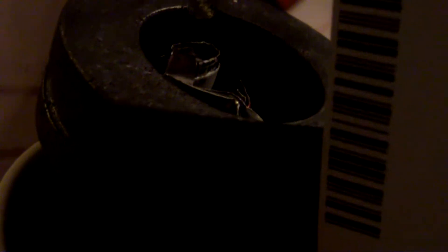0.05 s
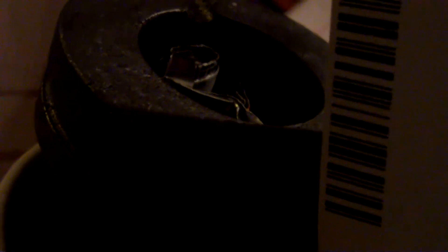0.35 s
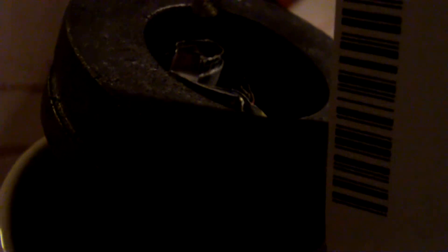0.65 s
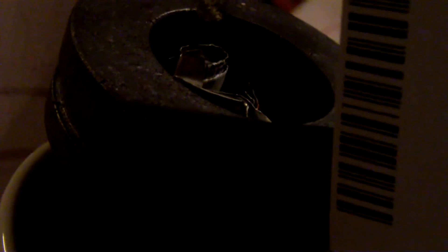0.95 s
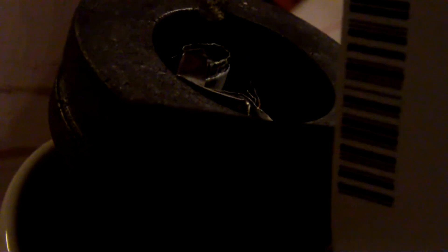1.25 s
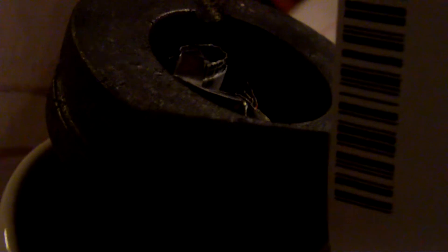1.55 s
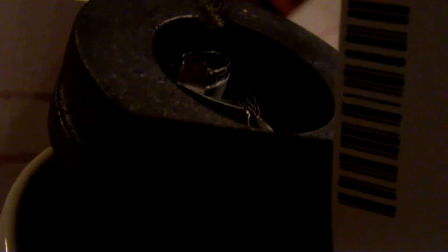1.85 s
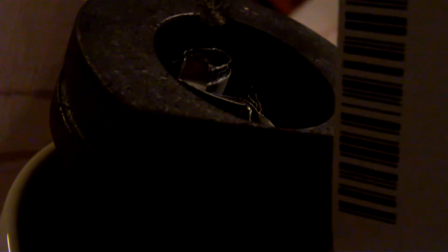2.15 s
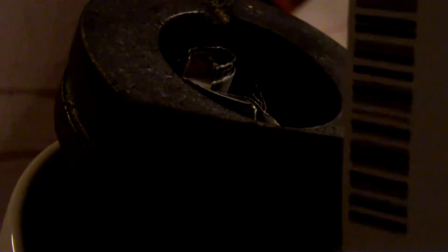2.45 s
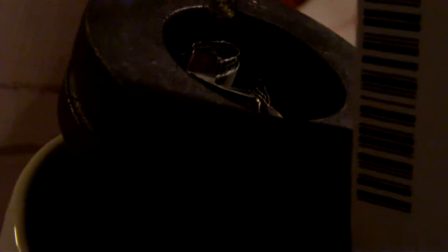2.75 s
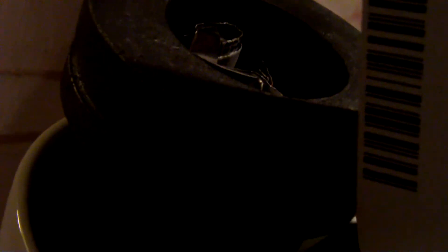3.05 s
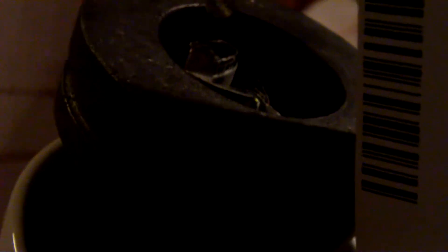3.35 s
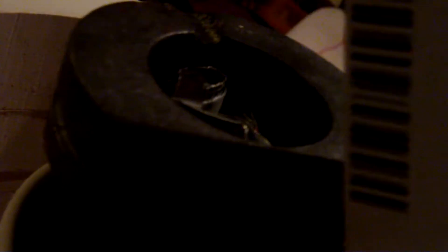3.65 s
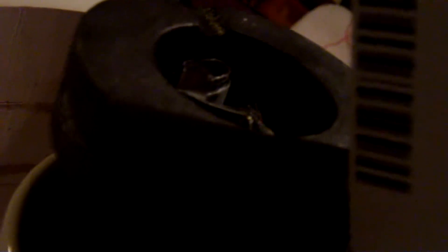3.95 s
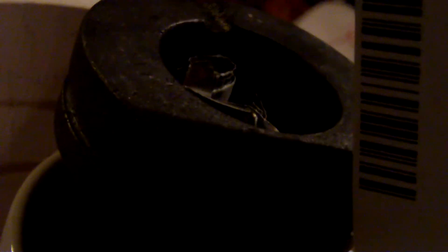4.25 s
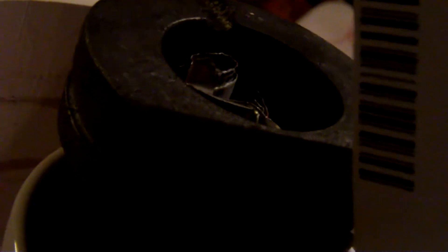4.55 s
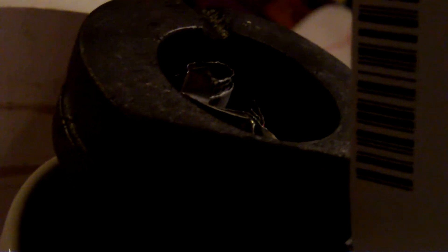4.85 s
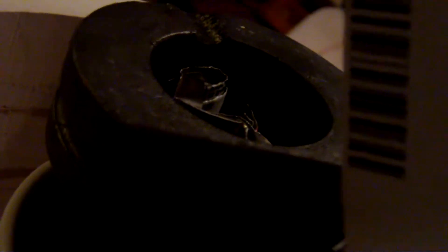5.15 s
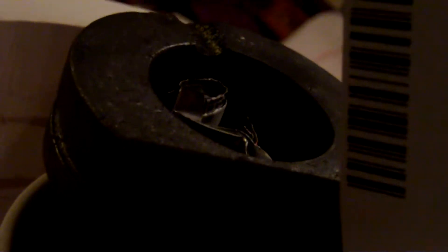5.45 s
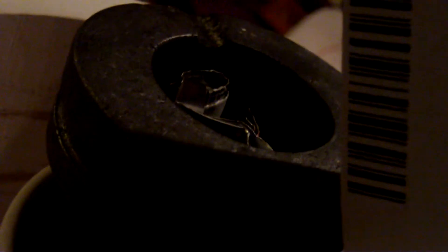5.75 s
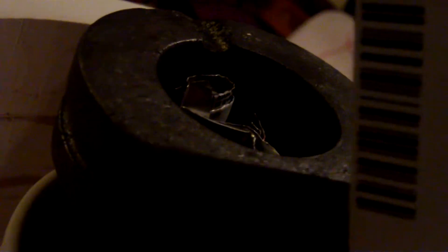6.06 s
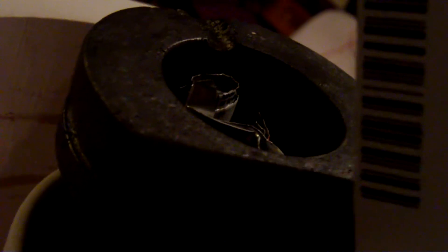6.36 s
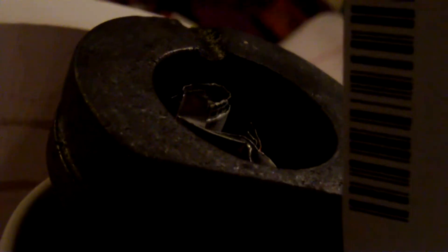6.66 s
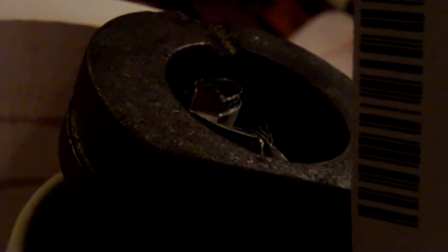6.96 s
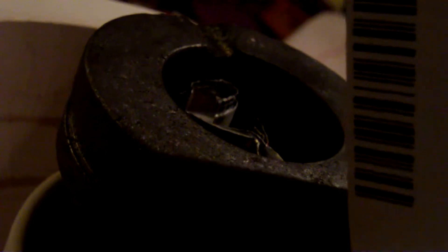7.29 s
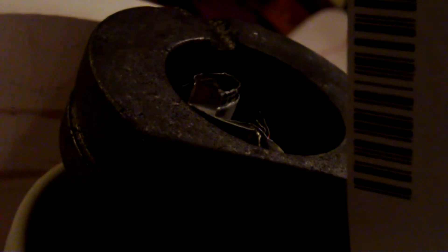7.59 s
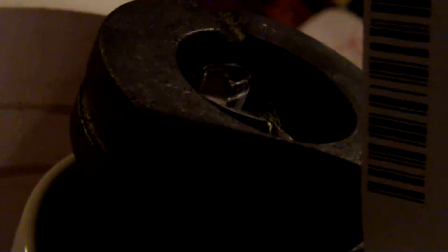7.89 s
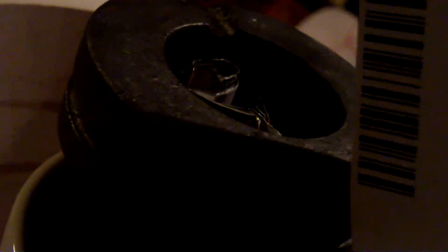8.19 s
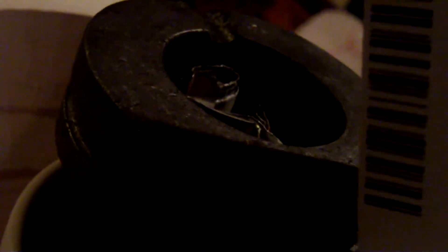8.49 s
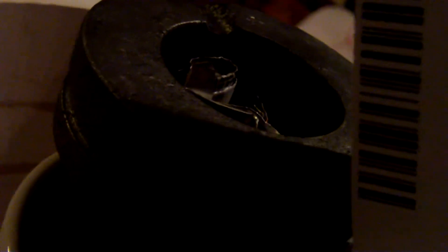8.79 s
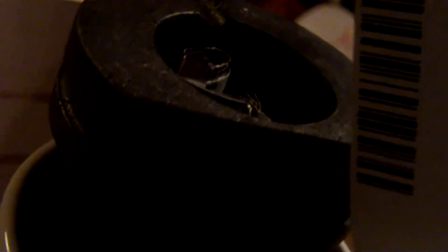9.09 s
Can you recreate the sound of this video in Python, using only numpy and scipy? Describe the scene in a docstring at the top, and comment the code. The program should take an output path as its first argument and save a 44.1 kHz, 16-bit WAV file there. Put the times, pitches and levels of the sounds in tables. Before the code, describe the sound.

A soft, bright hiss with a fine sizzle comes from something hot in the hollow of a stone bowl, close by in a quiet room. Two small, dry ticks sound at about 0.5 seconds, followed by faint rubs as the hiss sinks. At 2.6 seconds there is a tick and the hiss surges suddenly like escaping steam, loudest near 2.8 seconds. It drops back, swells more mildly around 3.8 seconds, then carries on at a moderate, wavering level. Light ticks come between 3.1 and 3.5 seconds, in a quick cluster near 4.4, sharply at 5.1 and once more at 7.8. From about 8 seconds the hiss sputters and fades low, still faint at 9 seconds. Underneath, the hand-held microphone picks up a low, even room rush, a few very soft bumps and a barely audible breathy whistle that comes and goes.

```python
"""Hot hiss in a stone bowl

Something hot hisses in the hollow of a stone-like bowl, close by in a quiet room. The vapour jet
is turbulence and fine sizzle ringing in the hollow; it surges once, slowly eases and sputters.
Light rubs and small ticks ring a damped body, with a few soft bumps in between.
A nearly mono hand-held microphone hears it over the room's low-level rush and a faint whistle."""
import sys
import numpy as np
from scipy import signal
from scipy.fft import rfft, irfft
from scipy.io import wavfile

SR = 44100
rng = np.random.default_rng(int(sys.argv[2]) if len(sys.argv) > 2 else 0)


def materialize(psi):
    """Save the field psi as 16-bit PCM at rate SR to the path in sys.argv[1].

    A 1-D psi becomes a single channel; in a 2-D psi each row is a channel.
    """
    bounded = np.clip(np.atleast_2d(psi).T, -1, 1)
    quanta = np.round(bounded * 32767).astype(np.int16)
    wavfile.write(sys.argv[1], SR, quanta)


N = 407043
TIME = np.arange(N) / SR
FREQS = np.maximum(np.arange(N // 2 + 1) * SR / N, 1)
CUTOFF_HZ = 15350


def from_db(db):
    """Decibels to gain."""
    return 10 ** (np.asarray(db) / 20)


def rms_one(x):
    """Scale to rms 1."""
    return x / np.sqrt(np.mean(x ** 2) + 1e-20)


def colour(x, points):
    """EQ x with a curve of (Hz, dB) points."""
    hz, db = np.transpose(points)
    return irfft(rfft(x) * from_db(np.interp(np.log(FREQS), np.log(hz), db)), N)


def band(x, low_hz, high_hz):
    """The part of x between two frequencies."""
    return irfft(rfft(x) * (FREQS > low_hz) * (FREQS < high_hz), N)


def drift(rate_hz):
    """A random wobble of rms 1, mostly slower than rate_hz."""
    return rms_one(irfft(rfft(rng.standard_normal(N)) / (1 + (FREQS / rate_hz) ** 2), N))


def swell(middle_s, length_s):
    """A smooth rise from 0 to 1 and back."""
    return np.cos(np.pi * np.clip((TIME - middle_s) / length_s, -.5, .5)) ** 2


def resonate(x, hz, width_hz):
    """A resonance with gain 1 at its peak."""
    return signal.lfilter(*signal.iirpeak(hz, hz / width_hz, fs=SR), x)


def ring(clicks, hz, t60):
    """Each click starts a sine of its own height that falls 60 dB in t60 seconds."""
    decay, step = from_db(-60 / (t60 * SR)), 2 * np.pi * hz / SR
    feedback = [1, -2 * decay * np.cos(step), decay * decay]
    return signal.lfilter([0, decay * np.sin(step)], feedback, clicks + 1e-18)


# Room tone EQ, for the centre and for the stereo width. Each row: frequency in Hz, gain in dB.
ROOM_MID_EQ = [(25, -8), (45, 0.5), (65, -5.5), (100, -1), (150, -2.5), (300, -0.5), (600, 2), (1150, 3),
               (2000, 2), (3500, -2.5), (7000, -2.5), (15000, -25.5)]
ROOM_SIDE_EQ = [(25, -32), (60, -15), (125, -11), (300, -2.5), (600, 1.5), (1000, 4.5), (2000, -11),
                (5000, -25), (9000, -28), (15000, -25)]

def room_rush(eq, level_db):
    """The room's even rush: a bed of coloured noise."""
    return from_db(level_db) * rms_one(colour(rng.standard_normal(N), eq))


def sizzle(per_s, spread_db):
    """Tiny bursts at random moments, each with a random size and sign."""
    sizes = from_db(spread_db * np.minimum(rng.exponential(1, N), 4)) * rng.choice([-1, 1], N)
    return rms_one(sizes * (rng.random(N) < per_s / SR))


def fizz(level_db=-12, t60=0.0033):
    """Tiny bursting bubbles: brief pings at pitches spread across the treble."""
    pitches_hz = np.linspace(2800, 14800, 14)
    pings = sum(ring(sizzle(per_s=80, spread_db=1.5), hz, t60) for hz in pitches_hz)
    return from_db(level_db) * rms_one(pings)


def reflections(x, level_db, longest_s, count=14):
    """Nearby surfaces return weak copies; their paths sway with the hand and ripple the spectrum."""
    sway, out = drift(rate_hz=.3), x.copy()
    lags_s = rng.uniform(0.000973, longest_s, count)
    swings_s = rng.normal(0, 1.2e-5, count)
    for lag, swing, sign in zip(lags_s, swings_s, rng.choice([-1, 1], count)):
        out += sign * from_db(level_db) * np.interp(TIME - lag - swing * sway, TIME, x)
    return out


# The jet's flow, as the envelope of its hiss. Each row: time in seconds, level in dB.
JET_FLOW = [(0, -51), (0.95, -51.8), (1.75, -56), (2.5, -57.5), (2.7, -38.5), (2.84, -31), (3.14, -37),
            (3.38, -45.5), (3.81, -39), (4.23, -46), (4.58, -43), (5.2, -48.5), (5.95, -47.5),
            (6.45, -44.5), (7.3, -45.5), (7.75, -47.5), (8.12, -55), (8.88, -53), (9.23, -59.5)]
# Brief spurts (+) and chokes (-). Each row: middle in seconds, length in seconds, boost or dip in dB.
JET_SPUTTERS = [(0.064, 0.27, 4.5), (2.273, 0.093, 4), (5.33, 0.17, 3), (5.415, 0.063, -5.5),
                (5.514, .1, -2), (6.282, 0.15, 4), (6.77, 0.14, -4), (6.847, .05, 2.5), (7.453, .1, -3.5),
                (8.368, 0.047, 4), (8.45, 0.14, -4.5), (8.54, .1, 5), (8.615, .06, -7)]
# The hollow's resonances. Each row: pitch in Hz, width in Hz, level in dB against the direct hiss.
HOLLOW_RESONANCES = [(1677, 160, 1), (3130, 300, -10.5), (3760, 340, -7), (5000, 270, -12.5),
                     (6830, 180, -12), (7610, 190, -14), (9470, 490, -11.5), (12300, 240, -10.5)]
# The jet's bright tone. Each row: frequency in Hz, gain in dB.
JET_EQ = [(400, -27), (1000, -17), (1600, -14), (2350, -9.5), (2900, -3.5), (4300, -5), (5200, -2.5),
          (6500, -2.5), (8600, -1), (9900, 0), (12500, -1.5), (15300, -2)]

def vapour_jet(sizzle_db=-11, flutter_db=0.5, rough_db=0.48, waver_db=0.3, split_hz=4500):
    """Turbulence and sizzle ring in the hollow; the flow sets their level and brightness."""
    flow_db = np.interp(TIME, *np.transpose(JET_FLOW))
    flow_db += sum(db * swell(middle, length) for middle, length, db in JET_SPUTTERS)
    source = rng.standard_normal(N) + from_db(sizzle_db) * sizzle(per_s=2500, spread_db=3.0)
    source *= from_db(flutter_db * drift(rate_hz=17) + rough_db * drift(rate_hz=200))
    source += fizz()
    hollow = sum(from_db(db) * resonate(source, hz, width) for hz, width, db in HOLLOW_RESONANCES)
    hiss = colour(reflections(source + hollow, level_db=-27.5, longest_s=.014), JET_EQ)
    # a strong jet is brighter: its lows swell less than its top
    top, low = band(hiss, split_hz, CUTOFF_HZ), band(hiss, 0, split_hz)
    usual_flow_db, low_cut_per_db = -45, 0.1644
    hiss = top + low * from_db(-low_cut_per_db * (flow_db - usual_flow_db))
    return from_db(flow_db + waver_db * drift(rate_hz=9.5)) * hiss / np.std(top)


# The body that rubs and ticks ring. Each row: pitch in Hz, level in dB, 60 dB decay time in seconds.
BODY_MODES = [(567, 0.5, 0.012), (740, -6, 0.028), (934, -5.5, 0.03), (1106, -0.5, 0.022),
              (1700, -7.5, 0.02), (2203, -8, 0.033), (2770, -2.5, 0.016), (3270, -3, 0.021),
              (4100, -5, .012), (5060, -4, 0.014), (6100, -6, 0.013), (7440, -2, 0.0062),
              (11000, -11, .007)]
# Light strokes. Each row: start in seconds, length in seconds, level in dB, favoured pitch in Hz.
RUB_STROKES = [(0.026, 0.07, -58.5, 1110), (1.227, 0.11, -59.5, 1000), (1.407, 0.076, -57.5, 1120),
               (3.17, 0.13, -57.5, 1100), (7.937, 0.097, -55, 910), (8.336, 0.039, -54, 1410)]

def rubs(rolloff_db_per_octave=-3, rasp_db=-2):
    """Dense little slips excite the body softly, most near one pitch, with a dry rasp on top."""
    slips, out = sizzle(per_s=1300, spread_db=-2.0), np.zeros(N)
    modes = [(hz, (-1) ** k * from_db(db) * ring(slips, hz, t60))
             for k, (hz, db, t60) in enumerate(BODY_MODES)]
    rasp = from_db(rasp_db) * rms_one(resonate(slips, hz=2740, width_hz=4300))
    for start, length, db, pitch_hz in RUB_STROKES:
        body = sum(from_db(rolloff_db_per_octave * abs(np.log2(hz / pitch_hz))) * mode
                   for hz, mode in modes)
        stroke = np.sqrt(np.sin(np.pi * np.clip((TIME - start) / length, 0, 1)))
        out += from_db(db) * stroke * (rms_one(body) + rasp)
    return out


# Small, dry ticks. Each row: start in seconds, level in dB, treble tilt in dB, low-end weight in dB.
TICK_HITS = [(0.4612, -37, -15, -22), (0.481, -34.5, -2, -19), (0.534, -45, -2, -5),
             (0.717, -47.5, -3.5, -16), (1.326, -46, -4, -12), (1.473, -46, -1.5, -22),
             (2.297, -43, -7, -7), (2.643, -39.5, -7, 0), (3.14, -42, -4, -7), (3.217, -39.5, 3, -23),
             (3.366, -42.5, 0, -13), (3.453, -44.5, 2.5, -4), (4.328, -44, 6, -5), (4.336, -41, 2, -3),
             (4.365, -39.5, 0, -1), (4.41, -41.5, -8, -8), (4.438, -43, -14, -11), (5.085, -43, -3, 0),
             (5.127, -34.5, -4, -6), (5.436, -45, 1, -2), (7.823, -40.5, -8, -4)]

def ticks(trim_db=-4, scatter_db=2.5, crack_db=-12, crack_s=0.0016, low_cut_hz=400):
    """Short contacts ring a well-damped body; harder ones reach the high modes and add a crack."""
    hz, mode_db, t60 = np.transpose(BODY_MODES)[:, :, None]
    octaves = np.log2(hz / 1150)  # treble and weight pivot on this pitch
    treble_share, low_share = np.clip(octaves / 1.4, 0, 2), np.clip(-octaves, 0, 1)
    age, out = TIME[:SR // 10], np.zeros(N)
    for start, db, treble_db, weight_db in TICK_HITS:
        strength_db = mode_db + treble_share * treble_db + low_share * weight_db
        # every contact falls on a different spot, so the modes' shares and pitches vary a little
        strength_db += rng.normal(0, scatter_db, hz.shape)
        pitch = hz * (1 + rng.normal(0, .04, hz.shape))
        phase = 2 * np.pi * (pitch * age + rng.random(hz.shape))
        modes = from_db(strength_db - 60 * age / t60) * np.sin(phase)
        # the low modes' first 4 ms set the scale of the hit
        low_modes = modes[hz[:, 0] < 1500].sum(axis=0)
        attack_height = np.sqrt(2) * np.std(low_modes[age < .004])
        crack = from_db(crack_db + treble_db) * np.exp(-age / crack_s) * rng.standard_normal(len(age))
        onset = round(start * SR)
        out[onset:onset + len(age)] += from_db(db + trim_db) * (modes.sum(axis=0) / attack_height + crack)
    return signal.sosfilt(signal.butter(2, low_cut_hz, "high", fs=SR, output="sos"), out)


def room_tail(x, level_db, t60):
    """The room adds a short diffuse decay to the direct sound."""
    tail = rng.standard_normal(SR // 2) * from_db(-60 * TIME[:SR // 2] / t60)
    return x + from_db(level_db) * signal.fftconvolve(x, tail / np.linalg.norm(tail))[:N]


# The whistle's swells. Each entry: time of the crest in seconds.
WHISTLE_CRESTS = [2.3, 5.35, 7.1, 8.35]

def whistle(hz=1400, width_hz=150, level_db=-65.5, length_s=1.0):
    """A faint, breathy whistle: a narrow band of noise that swells and fades."""
    swells = sum(swell(crest, length_s) for crest in WHISTLE_CRESTS)
    breath = resonate(rng.standard_normal(N), hz, width_hz)
    return from_db(level_db) * swells * rms_one(resonate(breath, hz, width_hz))


# Soft handling bumps. Each row: start in seconds, level in dB.
BUMP_HITS = [(2.288, -61), (2.646, -57), (5.434, -63), (6.247, -60), (8.647, -63), (8.663, -58)]

def bumps(thud_hz=115, deep_hz=55, deep_db=-8):
    """Soft knocks on the hand-held body give a brief low thud."""
    starts, db = np.transpose(BUMP_HITS)
    knocks = np.zeros(N)
    knocks[np.round(starts * SR).astype(int)] = from_db(db)
    return ring(knocks, thud_hz, t60=0.083) + from_db(deep_db) * ring(knocks, deep_hz, t60=.09)


def scene():
    """Everything sits dead centre; only the room's rush has a little width."""
    mid = vapour_jet() + room_tail(ticks() + rubs(), level_db=-11.5, t60=0.29)
    mid += whistle() + bumps() + room_rush(ROOM_MID_EQ, level_db=-57)
    side = room_rush(ROOM_SIDE_EQ, level_db=-81.5)
    return np.array([mid + side, mid - side])


def record(dry):
    """A narrow notch in the microphone's treble, then a steep top cut."""
    notched = dry - 0.69 * resonate(dry, hz=7830, width_hz=270)
    return signal.sosfilt(signal.ellip(12, .1, 80, CUTOFF_HZ, fs=SR, output="sos"), notched)


dry = scene()
out = record(dry)
materialize(out)
```